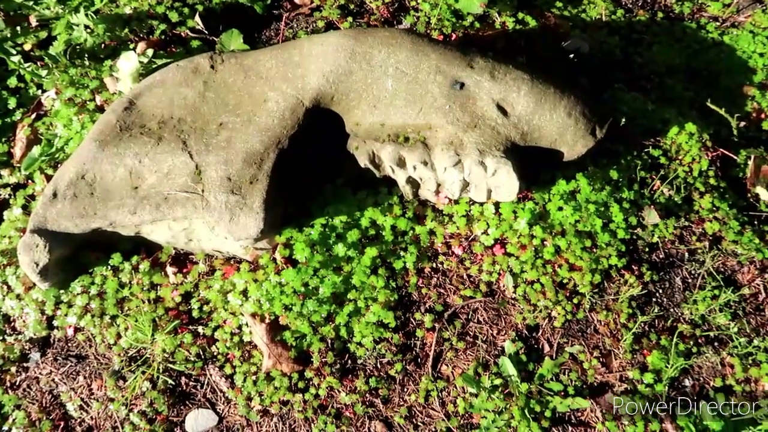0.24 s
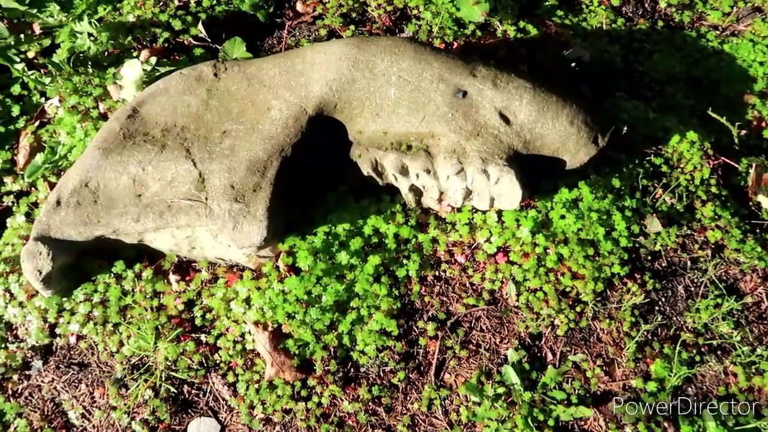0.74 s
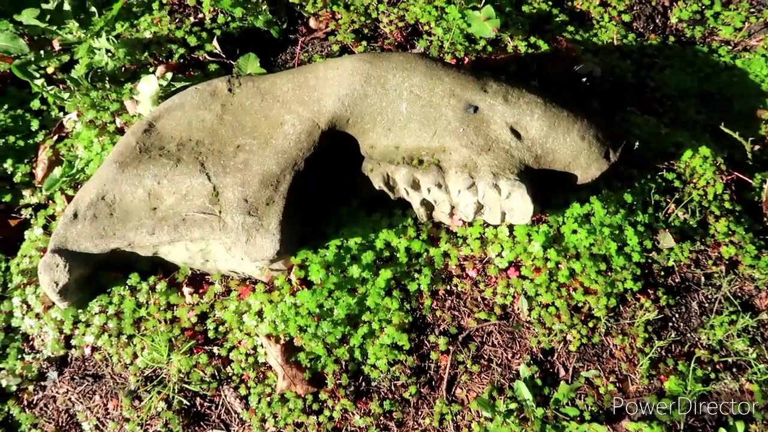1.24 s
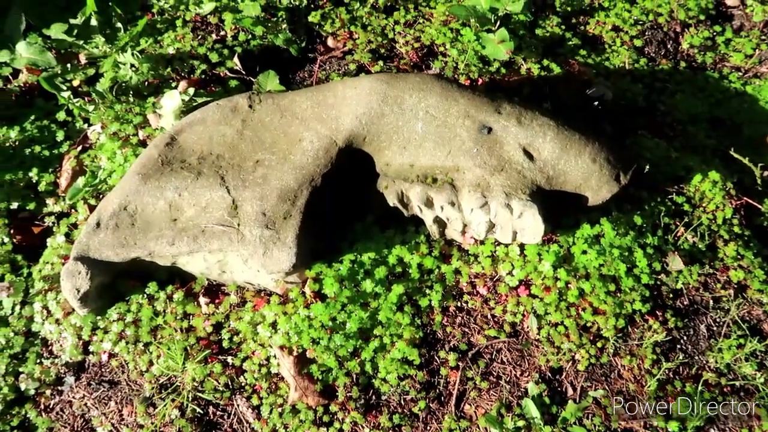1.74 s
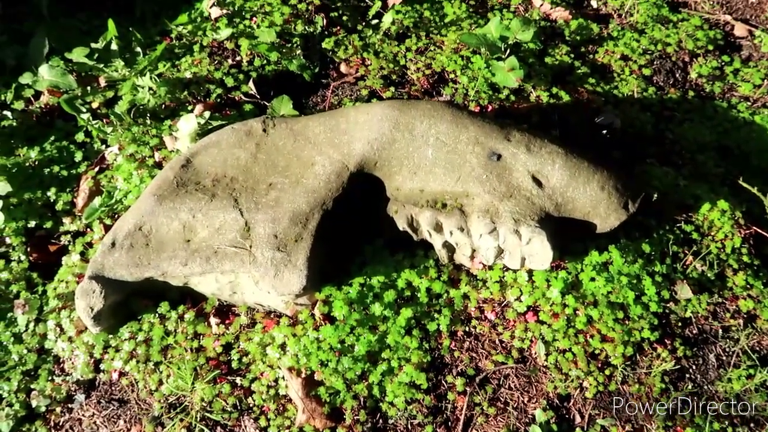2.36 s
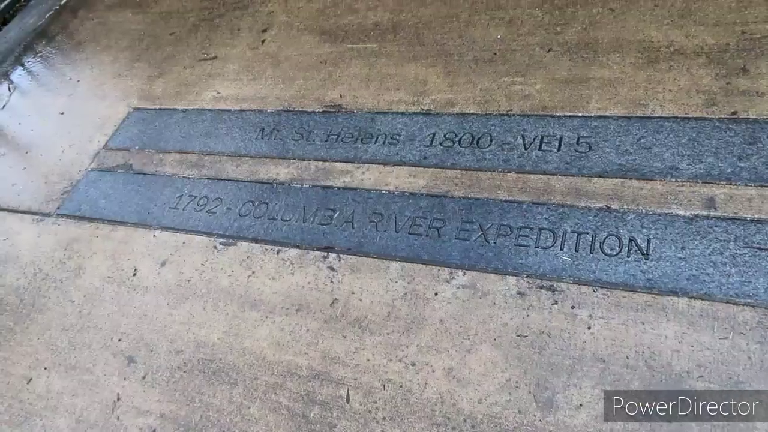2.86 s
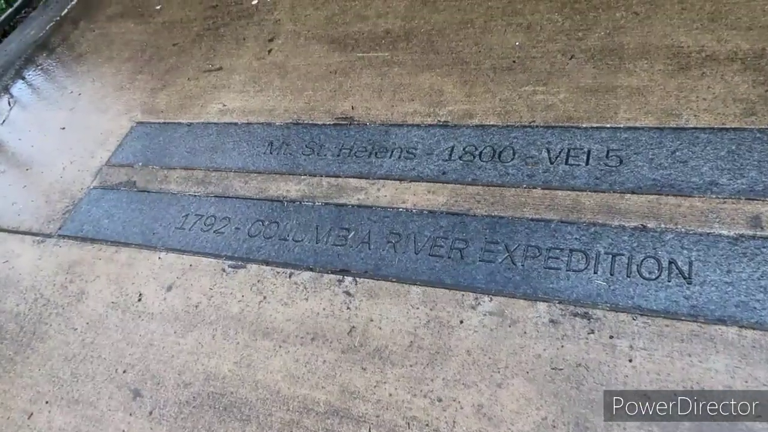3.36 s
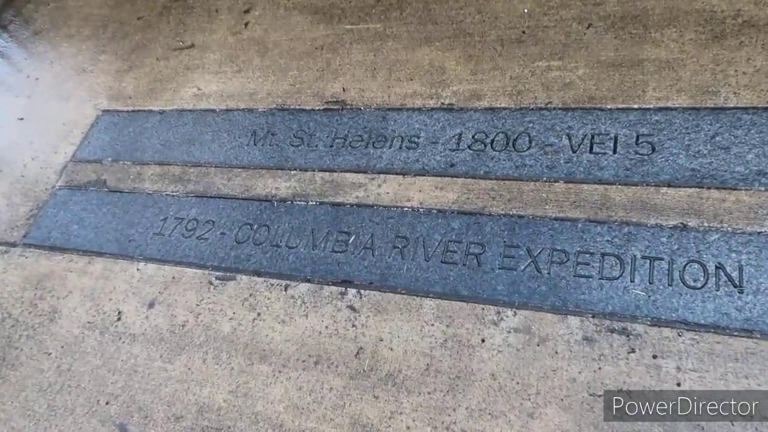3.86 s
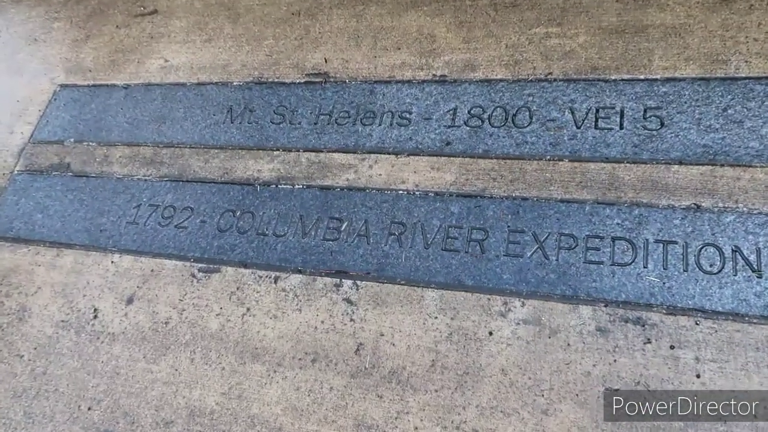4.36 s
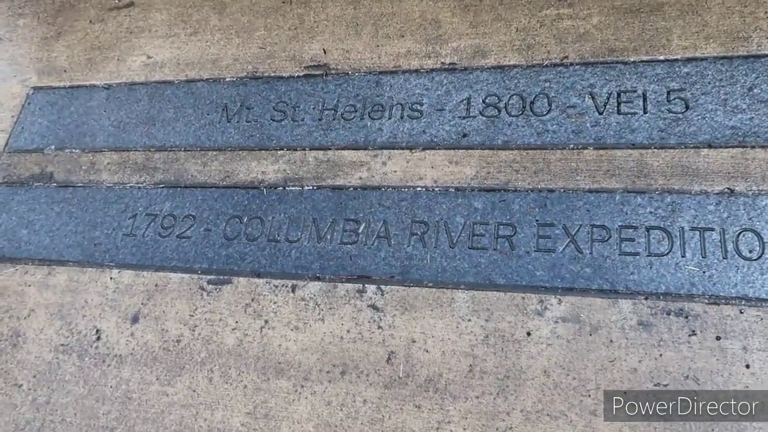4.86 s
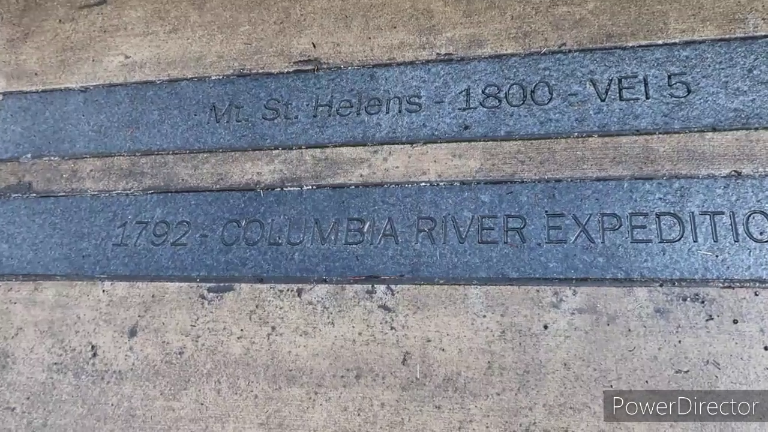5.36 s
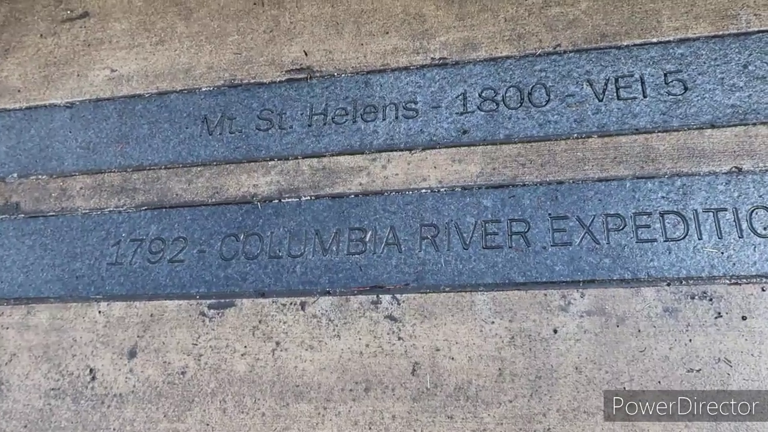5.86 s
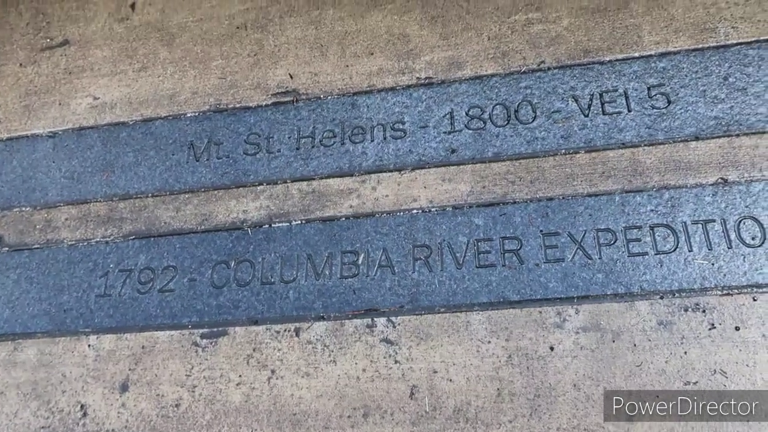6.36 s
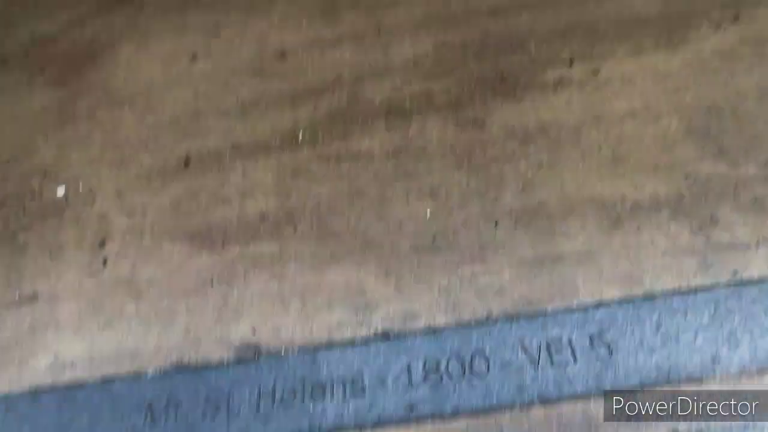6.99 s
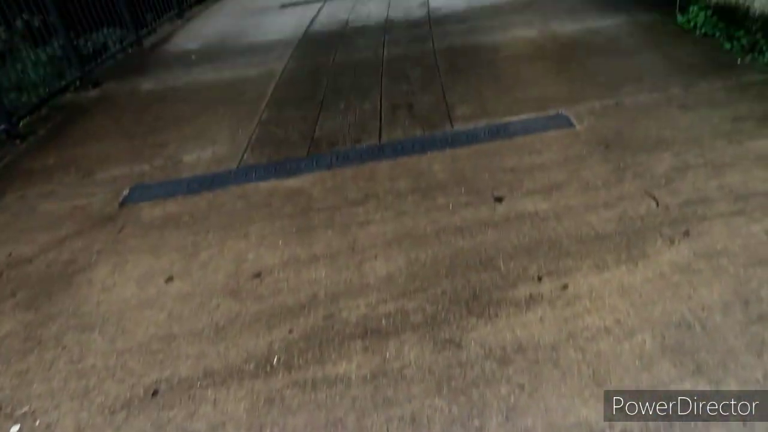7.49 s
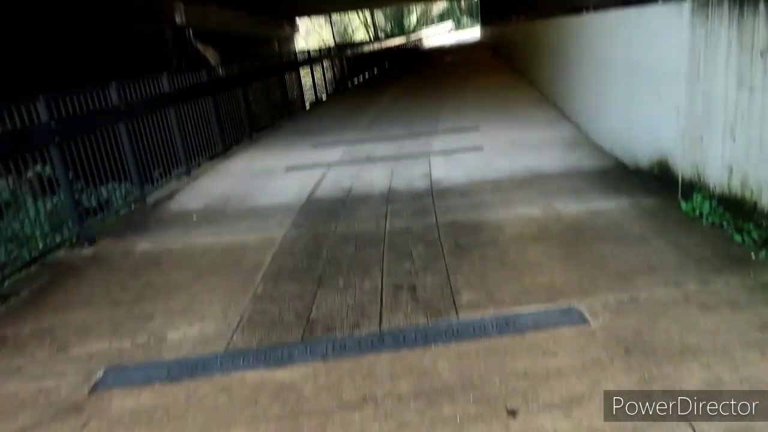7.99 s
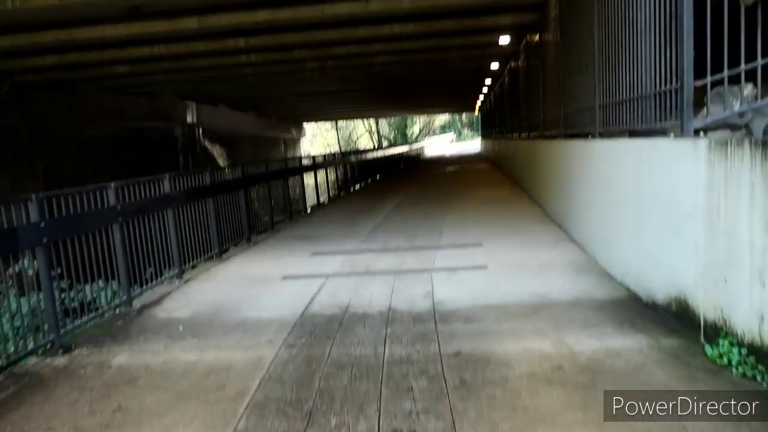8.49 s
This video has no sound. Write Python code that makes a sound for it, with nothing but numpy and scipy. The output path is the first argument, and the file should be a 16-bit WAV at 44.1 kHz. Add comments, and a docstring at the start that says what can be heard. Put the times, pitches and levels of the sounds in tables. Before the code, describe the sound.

Outdoors, distant traffic roars dully with a wavering engine drone and thin, faint high bird chirps. After a tiny silent gap, the sound jumps to a concrete underpass: tyre roar, deep rumble and muffled deck thumps overhead. A heavy vehicle drones across and lets off short air hisses, its brakes singing faintly. Traffic eases, then swells again after a sharp double click close to the stereo microphone. A faint electronic whine runs throughout.

```python
"""A garden some way off from a road, then after a cut a concrete underpass beneath the road.
In the garden, far traffic (shaped noise) roars dully, an engine (a wavering tone) drones and birds chirp.
In the underpass tyres roar and the deck rumbles (noise swelling as vehicles cross) and thumps (struck modes).
A heavy vehicle drones across, lets off air and brakes faintly (tones and noise); more vehicles swell up.
A sharp double click rings close to the microphone; a faint electronic whine is heard in both places."""
import sys
import numpy as np
from scipy import signal
from scipy.fft import rfft, irfft, next_fast_len
from scipy.io import wavfile
from scipy.ndimage import uniform_filter1d

SR = 44100
rng = np.random.default_rng(int(sys.argv[2]) if len(sys.argv) > 2 else 0)


def unload_audio(sound):
    """Save the sound as a 16-bit wav file, at the path given as the first command line argument."""
    columns = np.transpose(np.atleast_2d(sound))
    # keep every value between -1 and 1, then stretch to whole-number steps
    steps = np.round(np.clip(columns, -1, 1) * 32767)
    wavfile.write(sys.argv[1], SR, steps.astype(np.int16))


N = 384993
TIME = np.arange(N) / SR
LEFT_RIGHT = np.array([[1], [-1]])  # sign of each channel

# Vehicles crossing overhead, and at 5.21 a short broad thump from the deck. Each row: nearest (or loudest)
# at in seconds, time to cross (or width) in seconds, then the levels at that point in dB: deck rumble,
# underpass boom, tyre roar, fine tyre hiss (for the thump, its share of each of these bands).
OVERHEAD_SWELLS = [(3.3, 1, -34, -27.5, -28, -46.5), (4.18, 0.38, -30, -24, -29.5, -48.5),
                   (4.85, 0.54, -34, -27, -36.5, -49), (5.21, .1, -35, -30, -34.5, -62.5),
                   (6.42, 0.26, -32.5, -36.5, -35, -50.5), (8.05, 0.58, -42.5, -26, -26.5, -49.5),
                   (8.65, 0.56, -32, -23, -26, -46.5)]


def from_db(db):
    """Decibels to gain."""
    return 10 ** (np.asarray(db) / 20)


def rms_one(x):
    """Scale to rms 1."""
    return x / np.sqrt(np.mean(x ** 2) + 1e-20)


def in_time(rows):
    """Each column of a curve at every sample."""
    s, *columns = np.transpose(rows)
    return [np.interp(TIME, s, c) for c in columns]


def at_hz(points, hz):
    """Read a table on a log-frequency axis."""
    points = np.array(points)
    return np.interp(np.log(hz), np.log(points[:, 0]), points[:, 1])


def drift(rate):
    """Slow chance of spread 1, changing about rate times a second: noise through two equal low-passes."""
    step = 40  # samples between the computed points
    r = np.exp(-2 * np.pi * rate * step / SR)
    noise = rng.standard_normal(N // step + 2002)
    slow = signal.lfilter([1], [1, -2 * r, r * r], noise)[2000:]  # drop the filter's start
    return np.interp(np.arange(N) / step, np.arange(len(slow)), rms_one(slow))


def surge(level_db, flutter_db, rate):
    """Gain that follows a level and flutters about it."""
    return from_db(level_db + flutter_db * drift(rate))


def swell(peak_s, width_s):
    """A smooth rise and fall of height 1."""
    return np.exp(-(2 * (TIME - peak_s) / width_s) ** 2)


def ring(drive, hz, t60):
    """One decaying mode; a unit click rings at about height 1."""
    r = from_db(-60 / (t60 * SR))
    w = 2 * np.pi * hz / SR
    return signal.lfilter([0, np.sin(w)], [1, -2 * r * np.cos(w), r * r], drive + 1e-18)


def wash(colour, low_hz, high_hz, least_alike=-.94):
    """Diffuse stereo noise between two edges, alike in both ears in the bass, opposed at the very top."""
    # Each row: frequency in Hz, left-right likeness (1 the same, -1 opposed).
    likeness = [(60, .9999), (190, .9997), (250, .992), (320, .955), (450, .985), (750, .98), (1100, .955),
                (2000, .88), (3500, .5), (4500, .27), (6500, .07), (7500, -.08), (8500, -.45), (9500, -.74),
                (10500, -.84), (12000, -.94)]
    # Each row: frequency in Hz, left minus right in dB.
    balance_db = [(300, 0), (660, 1.0), (1200, 1.5), (2600, 1.1), (8000, 0)]
    left_lead_s = .000015
    size = next_fast_len(N)
    hz = np.maximum(np.arange(size // 2 + 1) * SR / size, 1)
    mid, side = rfft(rng.standard_normal((2, size)))
    alike = np.clip(at_hz(likeness, hz), least_alike, 1)
    width = np.sqrt((1 - alike) / (1 + alike))
    edges = 1 / np.sqrt((1 + (low_hz / hz) ** 12) * (1 + (hz / high_hz) ** 12))
    gain = edges * from_db(at_hz(colour, hz) + LEFT_RIGHT * at_hz(balance_db, hz) / 2)
    # the left ear's lead fades above 6 kHz
    arrival = np.exp(1j * np.pi * hz * left_lead_s * LEFT_RIGHT / (1 + (hz / 6000) ** 4))
    x = irfft(gain * arrival * (mid + LEFT_RIGHT * width * side), size)[:, :N]
    return x / np.std(x.mean(axis=0))  # the mean of the two ears has rms 1


def reflected(x):
    """Short shifting echoes off the ground and nearby surfaces: peaks and hollows wander, the level stays."""
    echo_count, changes_per_s, echo_db = 10, .7, -13.5
    lags = (rng.uniform(.002, .016, echo_count) * SR).astype(int)  # seconds to samples
    echoes = sum(drift(changes_per_s) * np.roll(x, lag, axis=-1) for lag in lags) / np.sqrt(echo_count)
    both = x + from_db(echo_db) * echoes
    power_before, power_after = (
        uniform_filter1d(np.mean(v ** 2, axis=0), size=SR // 10) for v in (x, both))
    return both * np.sqrt(power_before / power_after)


def engine(hz, levels_db, wobble, rough_db, scatter):
    """Low harmonics of an unsteady firing rate, each fading in and out as its echoes shift."""
    phase = 2 * np.pi * np.cumsum(hz * (1 + wobble * drift(7.2))) / SR
    out = 0
    for number, db in enumerate(levels_db, start=1):
        level = np.sqrt(2) * surge(db, rough_db, 13.0)
        out = out + level * np.sin(number * (phase + scatter * drift(19)))  # scatter in radians
    return out


def passing(nearest_s, cross_s):
    """Share of full power from a source driving past at steady speed."""
    falloff = 1.71  # power falls with squared distance raised to this
    return (1 + ((TIME - nearest_s) / cross_s) ** 2) ** -falloff


def overhead_db(stream_db, swell_dbs):
    """Level of the unbroken stream of traffic plus every swell overhead, their powers added."""
    power = from_db(stream_db) ** 2
    for (peak_s, width_s, *_), db in zip(OVERHEAD_SWELLS, swell_dbs):
        power = power + from_db(db) ** 2 * passing(peak_s, width_s)
    return 10 * np.log10(power)


def near_road():
    """Traffic overhead: the deck rumbles, the underpass booms, tyre noise spills in from the sides."""
    # Colours of the road noise close to. Each row: frequency in Hz, level in dB per Hz.
    near_low = [(20, -22.5), (35, -7.5), (55, -5.5), (75, -1.5), (110, -6), (150, -5.5), (220, -5),
                (300, -7.5), (420, -13.5)]
    near_high = [(450, 0.5), (620, 2), (900, -1), (1200, -6.5), (1600, -10), (2200, -18), (3100, -25.5),
                 (4200, -32.5), (5600, -40), (7500, -46.5), (9500, -59.5), (10500, -57.5), (12400, -67),
                 (15000, -82.5)]
    # The tyre noise leans as the microphone turns. Each row: time in seconds, left minus right in dB.
    lean = [(2.84, 0.5), (4.4, -1), (5.3, -0.8), (6.2, 0.7), (7.5, .6), (8.7, .1)]
    _, _, deck_db, boom_db, roar_db, fizz_db = np.transpose(OVERHEAD_SWELLS)
    hiss_db = roar_db - 8.5  # each swell's hiss under its roar
    deck = surge(overhead_db(-34, deck_db), 0.79, 4.1) * wash(near_low, 15, 133)
    boom = surge(overhead_db(-31.5, boom_db), 0.34, 26.0) * wash(near_low, 114.0, 460)
    roar = surge(overhead_db(-30, roar_db), 0.93, 3.1) * wash(near_high, 495, 1090)
    hiss = surge(overhead_db(-32.5, hiss_db), 1.0, 35) * wash(near_high, 972, 2570)
    fizz = surge(overhead_db(-48.5, fizz_db), 1.0, 21) * wash(near_high, 2500, 11000)
    lean_db, = in_time(lean)
    return deck + boom + reflected(roar + hiss + fizz) * from_db(lean_db * LEFT_RIGHT / 2)


def thumps():
    """Soft tyre blows set the deck ringing briefly; the concrete smears each into a rough tail."""
    # Wheels knocking the deck. Each row: start in seconds, level in dB ahead of the deck's treble loss,
    # ring in Hz, t60 in seconds.
    knocks = [(2.834, -13.5, 283, 0.038), (2.864, -7, 130, 0.053), (2.905, -16, 42, 0.27),
              (4.1, -20, 55, 0.22), (4.6, -13, 245, 0.06), (4.724, -2.5, 401, 0.038),
              (4.762, -22, 280, .05), (4.9, -10, 242, 0.077), (4.925, -14, 425, 0.23),
              (4.978, -11, 410, 0.048), (5.163, -13.5, 764, .05), (5.207, -7.5, 645, 0.024),
              (5.215, -20, 52, 0.24), (5.238, -18, 500, .05), (7.36, -24, 171, 0.056),
              (8.67, -18, 346, 0.083)]
    deck_cut_hz = 2100  # the deck passes little treble
    out = np.zeros(N)
    for s, db, hz, t60 in knocks:
        age = np.maximum(TIME - s, 0)
        blow = from_db(-60 * age / t60) * np.sin(2 * np.pi * hz * age)
        rough = rms_one(ring(rng.standard_normal(N), hz, 7 / hz))
        echo = from_db(-18.0 - 60 * age / 0.51) * rough
        soft_start = 1 - np.exp(-age / 0.0026)
        out += from_db(db) * soft_start * (blow + echo)
    return signal.sosfilt(signal.butter(2, deck_cut_hz, fs=SR, output="sos"), out + 1e-18)


def truck_engine():
    """A heavy vehicle drones across, its note dropping as it passes, sagging as it slows, then blurring."""
    # Level of the drone. Each row: time in seconds, level in dB.
    truck_drone = [(2.85, -26), (3.22, -23), (3.33, -27.5), (3.44, -23), (3.7, -22.5), (3.81, -29),
                   (3.93, -44), (4.2, -28), (4.3, -27), (4.42, -18.5), (4.62, -38), (4.85, -26.5),
                   (4.97, -32.5), (5.3, -33.5), (5.45, -27.5), (5.95, -41), (6.3, -30.5), (7.0, -35.5),
                   (8.0, -34.5), (8.18, -25), (8.33, -29), (8.7, -30)]
    note_hz, nearest_s, cross_s = 94.6, 4.25, 0.443
    doppler_hz, slowing_hz_per_s, second_harmonic_db = 4.6, 1.5, -9
    near_scatter_rad, far_scatter_rad, fades_s = .18, .7, 2  # echoes blur the note more further away
    past = TIME - nearest_s
    hz = note_hz - doppler_hz * past / np.hypot(past, cross_s) - slowing_hz_per_s * past
    db, = in_time(truck_drone)
    gone = np.clip(past / fades_s, 0, 1)
    scatter = near_scatter_rad + gone * (far_scatter_rad - near_scatter_rad)
    levels_db = [db, db + second_harmonic_db]
    return engine(hz, levels_db, wobble=0.0082, rough_db=1.5 + 2 * gone, scatter=scatter)


def overhead_hum():
    """A low hum, a wavering tone, comes in uneven surges as vehicles cross the deck."""
    # Each row: peak in seconds, pitch in Hz, width in seconds, peak level in dB.
    hum_surges = [(2.87, 205, .06, -25), (2.96, 204, 0.11, -23), (4.07, 233, 0.061, -18.5),
                  (4.13, 182, 0.12, -21), (4.31, 189, 0.055, -24.5), (4.53, 196, 0.067, -18),
                  (4.666, 195.5, 0.13, -15.5), (4.82, 202, 0.12, -20), (4.938, 186, 0.036, -15.5),
                  (4.997, 198, 0.031, -13), (5.12, 197, 0.09, -21.5), (6.25, 124, 0.11, -28),
                  (6.539, 128.3, .13, -24), (8.249, 224, .2, -26), (8.42, 194, 0.24, -30)]
    waver_rad = 0.25 * drift(20)
    out = 0
    for s, hz, width, db in hum_surges:
        out = out + from_db(db) * swell(s, width) * np.sin(2 * np.pi * hz * (TIME - s) + waver_rad)
    return out


def truck_tread():
    """Coarse tread sings in narrow bands that sink as the vehicle crosses, a fine hiss trailing behind."""
    # Each row: loudest at in seconds, width in seconds, pitch in Hz, sinking in Hz per second,
    # bandwidth in Hz, level in dB.
    tread_notes = [(3.0, .8, 733, 70, 60, -30.5), (3.25, 1.0, 212.1, 5, 25, -30),
                   (3.5, .8, 635, 110, 50, -29), (3.98, .4, 833, 40, 40, -31),
                   (4.3, .9, 589.7, 20, 70, -30), (4.75, 0.99, 1650, 160, 60, -44)]
    # Colour of the trailing hiss. Each row: frequency in Hz, level in dB per Hz.
    trail_colour = [(5000, 0), (8000, 1.5), (10000, 2.5), (12000, -21)]
    lean_db = -1  # left minus right
    tread = 0
    for s, width, hz, sink, band_hz, db in tread_notes:
        phase = 2 * np.pi * np.cumsum(hz - sink * np.clip(TIME - s, -width, width)) / SR
        # slow noise on a cosine and a sine makes a narrow band about the pitch
        band = drift(band_hz) * np.cos(phase) + drift(band_hz) * np.sin(phase)
        tread = tread + from_db(db) * swell(s, width) * band
    trail_level = surge(-62, 1.0, 13) * np.sqrt(passing(nearest_s=4.8, cross_s=0.34))
    trail = trail_level * wash(trail_colour, 4100, 9700, least_alike=-.2)
    return tread * from_db(lean_db * LEFT_RIGHT / 2) + trail


def air_puffs():
    """Ragged hiss that starts abruptly, holds and dies away in the concrete space."""
    # Each row: start in seconds, level in dB, extra dB of the opening spit, hold in seconds,
    # t60 in seconds, top edge in Hz.
    puffs = [(3.508, -43, 2, 0.072, 1.4, 13000), (3.675, -46, -1, 0.13, 1.3, 12500),
             (6.381, -44.5, 4, 0.012, 0.36, 8200), (7.773, -53, 2, 0.024, .2, 12000),
             (8.607, -54, 6, 0.11, .4, 12000)]
    # Each row: frequency in Hz, level in dB per Hz.
    puff_colour = [(1200, -10), (2200, 6), (3200, 8.5), (4500, 3.5), (6000, 1), (7500, -3), (9500, -13),
                   (10500, -32), (12400, -34), (15000, -37)]
    attack_s, spit_s = .0015, .016
    out = 0
    for s, db, spit_db, hold, t60, top_hz in puffs:
        age = np.maximum(TIME - s, 0)
        level_db = db + spit_db * np.exp(-age / spit_s) - 60 * np.maximum(age - hold, 0) / t60
        opening = np.minimum(age / attack_s, 1)
        out = out + opening * from_db(level_db) * wash(puff_colour, 1200, top_hz)
    return out * surge(0, 1.6, 70)


def brakes():
    """Brakes sing faintly: noise in a narrow, very high band."""
    # Each row: peak in seconds, width in seconds, level in dB.
    squeals = [(5.29, .2, -77), (5.52, 0.42, -69)]
    # Each row: frequency in Hz, level in dB per Hz.
    squeal_colour = [(7600, -18), (8700, -4), (9300, 1), (10000, -18), (12000, -45)]
    level = sum(from_db(db) * swell(s, width) for s, width, db in squeals)
    return level * surge(0, 2.5, 25) * wash(squeal_colour, 8000, 10500)


def clicks():
    """Two tiny hard contacts ring high, short modes, reach the left ear first and leave a faint echo."""
    # Close to the microphone. Each row: start in seconds, level in dB.
    contacts = [(8.005, -14), (8.0146, -34)]
    # Each row: frequency in Hz, level in dB within the click, t60 in seconds.
    click_modes = [(3750, -16, .003), (5200, -10, 0.0037), (6900, -4.5, 0.0034), (10150, 0, 0.0047),
                   (13000, -5, 0.005), (15200, -7, 0.0033)]
    right_lag_s = .000031
    out = np.zeros((2, N))
    span = np.arange(SR // 5) / SR
    age = np.maximum(span - np.array([[0], [right_lag_s]]), 0)
    for s, db in contacts:
        tick = 0
        for k, (hz, mode_db, t60) in enumerate(click_modes):
            mode = from_db(mode_db - 60 * age / t60) * np.sin(2 * np.pi * hz * age)
            tick = tick + (-1) ** k * mode
        rough = rms_one(ring(rng.standard_normal(age.shape), 9000, .0004))
        echo = from_db(-30 - 60 * age / 0.089) * rough
        start = round(s * SR)
        out[:, start:start + len(span)] += from_db(db) * (tick + echo)
    return out


def far_road():
    """Distant traffic, held steady: dull roar over a rumble, with one engine droning."""
    # Colours of the road noise far off. Each row: frequency in Hz, level in dB per Hz.
    far_low = [(20, -19), (35, -7.5), (58, 2), (75, 0), (100, -1), (160, -5.5), (220, -9.5), (320, -10.5),
               (430, -9)]
    far_high = [(450, -0.5), (650, 1), (900, 1), (1300, -6.5), (1700, -13), (2300, -21), (3300, -30),
                (4500, -39), (6500, -46), (10000, -52.5), (12800, -55), (14500, -70)]
    # The engine pulls up to its top note, then sinks. Each row: time in seconds, pitch in Hz.
    far_pitch = [(0, 130), (.5, 130), (1.05, 133.5), (1.35, 138), (1.75, 124), (2.45, 117), (2.77, 115)]
    # Its drone comes and goes. Each row: time in seconds, level in dB.
    far_drone = [(0, -37.5), (.5, -37), (.97, -31), (1.2, -39.5), (1.55, -29.5), (1.9, -36), (2.05, -40),
                 (2.26, -39), (2.38, -24.5), (2.58, -43)]
    rumble = surge(-31, 1.0, 4.7) * wash(far_low, 15, 385)
    roar = surge(-32, 1.0, 2.4) * wash(far_high, 460, 1440)
    hiss = surge(-41, 0.31, 4.1) * wash(far_high, 1340, 12400, least_alike=-0.17)
    hz, = in_time(far_pitch)
    drone_db, = in_time(far_drone)
    drone = engine(hz, [drone_db], wobble=0.0038, rough_db=1.6, scatter=0.088)
    return rumble + reflected(roar + hiss) + drone


def birds():
    """Thin, high chirps that arch, glide and waver, each reaching the two ears out of step."""
    # Each row: start in seconds, pitch in Hz, length in seconds, level in dB, glide in Hz.
    chirps = [(0.165, 8120, 0.08, -63, 60), (.22, 7470, 0.045, -68, -150), (.25, 8000, .085, -68, 100),
              (0.368, 8200, 0.13, -65, -60), (0.388, 7520, 0.1, -66, -300), (0.508, 8680, 0.09, -67, 200),
              (.545, 7700, 0.07, -68, 100), (.84, 8150, .1, -72, 0), (.87, 7480, .1, -74, -150),
              (1.005, 7900, 0.08, -68, 550), (1.1, 7480, 0.075, -68, 300), (1.21, 8220, .08, -71, 0),
              (1.56, 8200, .1, -72, 50), (1.68, 7520, 0.09, -64, -250), (1.7, 8200, .06, -71, 0),
              (1.745, 7580, .075, -68, 200), (2.55, 7820, .08, -68, -50)]
    arch_hz = 130
    out = np.zeros((2, N))
    waver = .004 * drift(110)  # share of the pitch
    for s, hz, length, db, glide_hz in chirps:
        span = slice(int(s * SR), int((s + length) * SR))
        age = (TIME[span] - s) / length
        arch = np.clip(4 * age * (1 - age), 0, 1)
        pitch = hz * (1 + waver[span]) + glide_hz * (age - .5) - arch_hz * (1 - arch)
        phase = 2 * np.pi * np.cumsum(pitch) / SR + LEFT_RIGHT * np.pi / 4
        out[:, span] += from_db(db) * np.sqrt(arch) * np.sin(phase)
    return out * surge(0, 2.0, 60)


def electronic_whine():
    """A very high tone that pulses thirty times a second, well out of step between the two channels."""
    whine_hz, pulses_per_s, pulse_depth = 13007, 30, .62
    pulsing = 1 + pulse_depth * np.cos(2 * np.pi * pulses_per_s * TIME)
    tone = np.sqrt(2) * np.sin(2 * np.pi * whine_hz * TIME + 1.14 * LEFT_RIGHT)  # phase in radians
    return pulsing * surge(-66, 2.6, 70) * tone


def scene():
    """The garden, a brief silence at the cut, then the underpass."""
    garden_end_s, underpass_start_s = 2.773, 2.817
    in_garden = np.clip((garden_end_s - TIME) / .0003, 0, 1)
    in_underpass = np.clip((TIME - underpass_start_s) / .018, 0, 1) ** 1.3
    underpass = near_road() + thumps()
    underpass = underpass + truck_engine() + overhead_hum() + truck_tread()
    underpass = underpass + air_puffs() + brakes() + clicks()
    garden = far_road() + birds()
    whine = electronic_whine()
    return (garden + whine) * in_garden + (underpass + whine) * in_underpass


def record(dry):
    """The top is cut steeply: 70 dB down from 17 kHz up."""
    return signal.sosfilt(signal.cheby2(12, 70, 17000, fs=SR, output="sos"), dry)


dry = scene()
out = record(dry)
unload_audio(out)
```